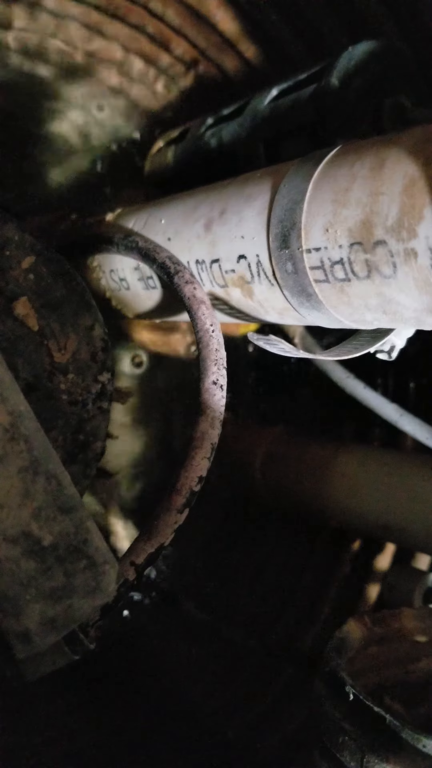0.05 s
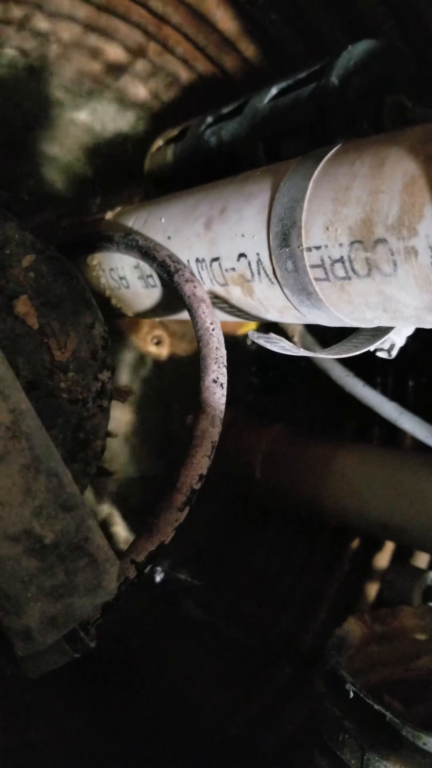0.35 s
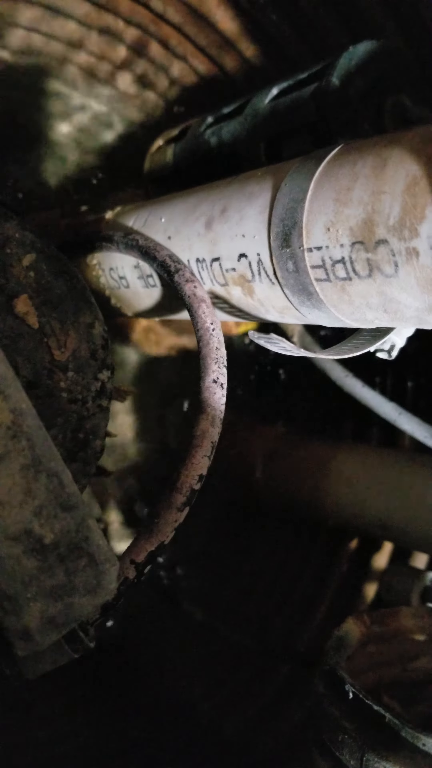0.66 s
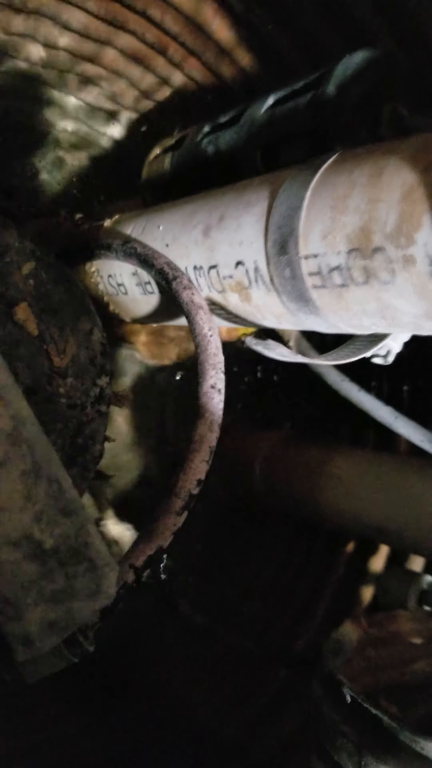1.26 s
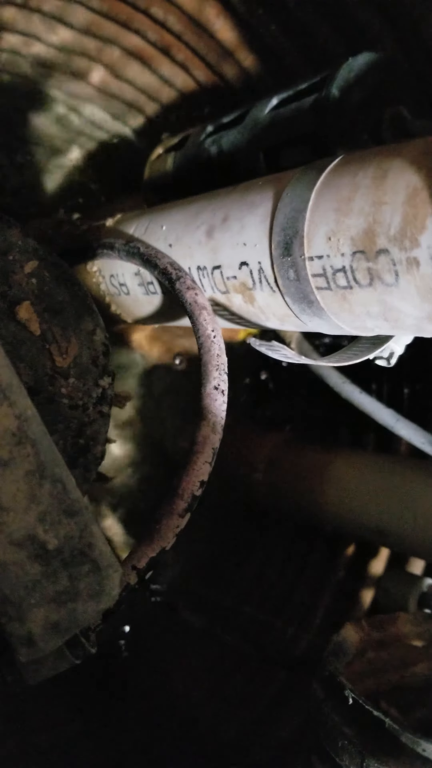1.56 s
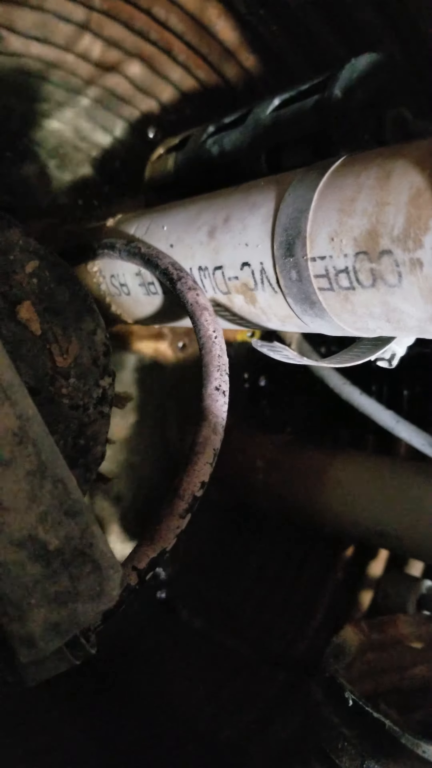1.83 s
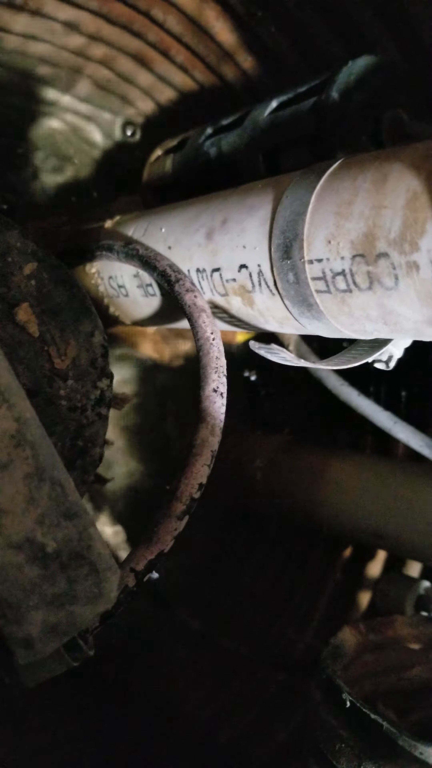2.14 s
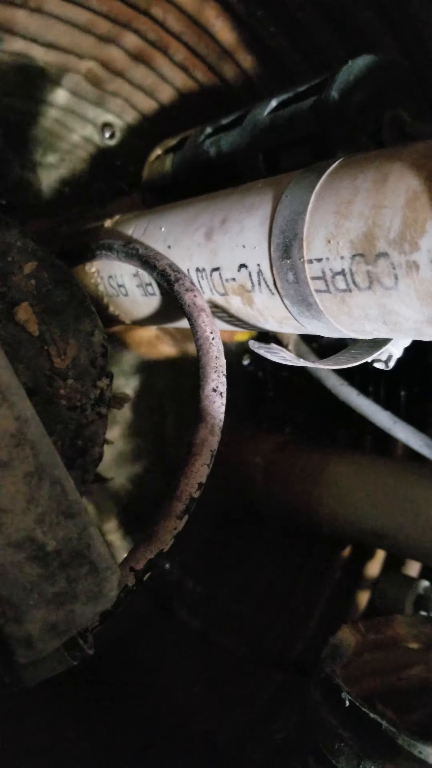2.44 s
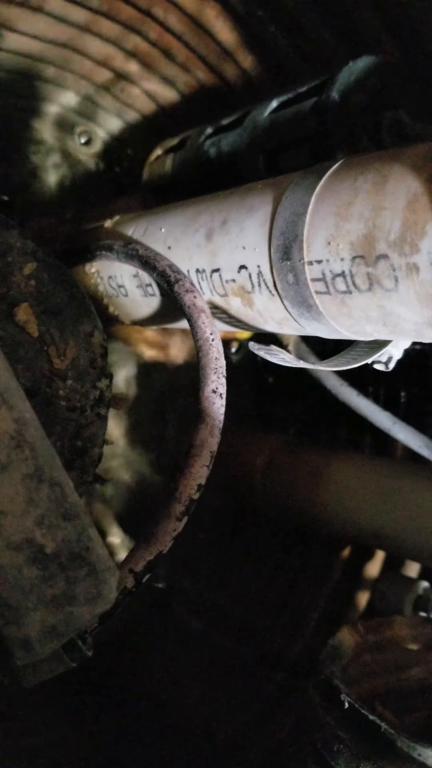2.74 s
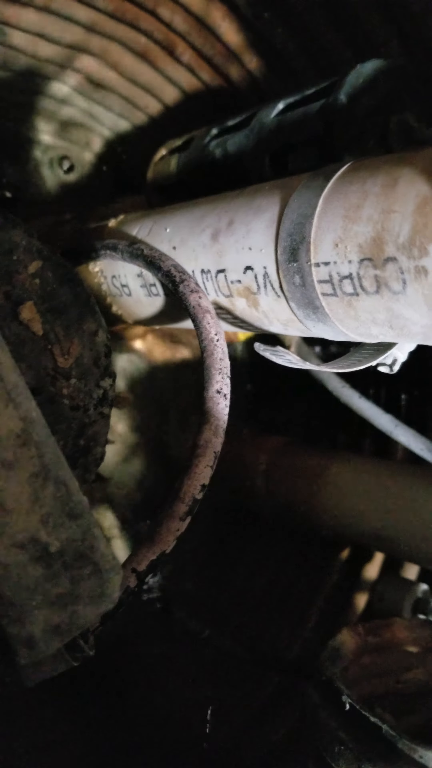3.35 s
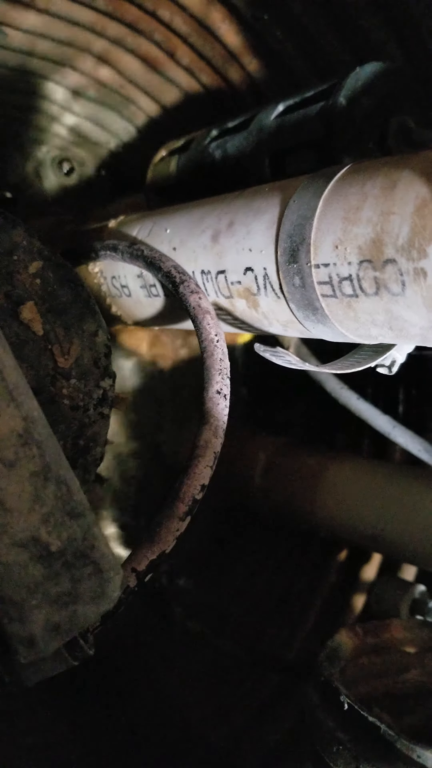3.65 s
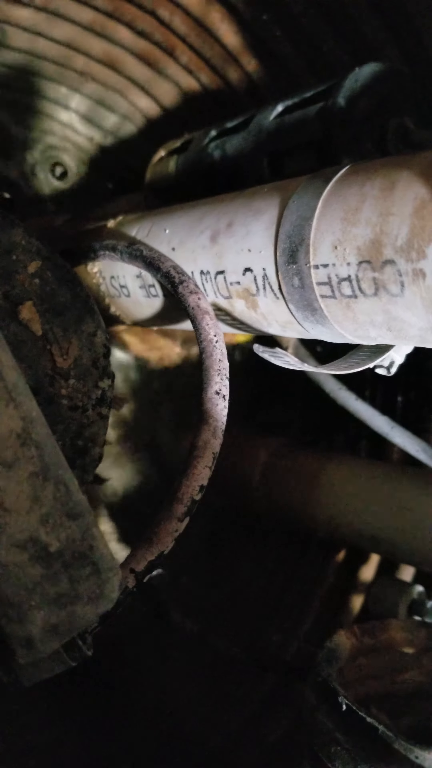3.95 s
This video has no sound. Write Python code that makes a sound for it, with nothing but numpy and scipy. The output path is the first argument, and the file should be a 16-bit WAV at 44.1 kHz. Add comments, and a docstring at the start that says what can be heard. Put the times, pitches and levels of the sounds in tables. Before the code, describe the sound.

Drops of water plop and tick in a sump pit with a short, close echo. A thin trickle and a few soft scuffs pass at the start, while a faint hiss dwindles and machinery hums steadily underneath.

```python
"""Dripping in a sump pit

Water drips into a narrow pit, heard from just above. Each drop slaps the pool and traps an air bubble
that rings as a damped oscillator; spatter ticks on the pipes, and the pit wall reflects it all.
A fine spray hisses and slowly dies away over the rumble and hum of machinery.
Early on there are soft bumps and scuffs."""
import sys
import numpy as np
from scipy import signal
from scipy.fft import rfft, irfft, next_fast_len
from scipy.io import wavfile
from scipy.ndimage import uniform_filter1d

SR = 44100
rng = np.random.default_rng(int(sys.argv[2]) if len(sys.argv) > 2 else 0)


def log_audio(samples):
    """Write samples as a 16-bit WAV file to the path given in sys.argv[1]."""
    # one column per channel
    frames = np.atleast_2d(samples).T
    # limit to full scale, then quantise
    limited = np.clip(frames, -1, 1)
    pcm = np.round(limited * 32767).astype(np.int16)
    wavfile.write(sys.argv[1], SR, pcm)


N = 176400
T = np.arange(N) / SR
EVENT_T = T[:SR // 4]  # time axis of one short event

# Spectra of the steady and flowing sources. Each row: frequency in Hz, relative density in dB.
RUMBLE_SPECTRUM = [(15, -20), (30, -15), (50, 1.5), (80, -4.5), (104, 0), (130, -7), (160, -7.5),
                   (195, -10), (250, -25), (350, -33), (700, -59.5), (2000, -59)]
AIR_SPECTRUM = [(60, -10), (150, 14), (250, -4), (400, 0.5), (540, 0), (760, -0.5), (1000, -9.5),
                (1500, -9), (3000, -22.5), (8000, -37.5), (16000, -9.5)]
SPRAY_SPECTRUM = [(900, -18), (1800, -23.5), (2600, -17.5), (4200, -17.5), (6000, -14.5), (7500, -14),
                  (9000, -8), (11000, -9.5), (13000, -5), (15500, 5.5)]
TRICKLE_SPECTRUM = [(1000, -27), (1800, -6), (2600, 1), (3500, -2.5), (4700, -7.5), (6200, -6.5),
                    (8000, -11)]
# Spectra of a bump, a scuff and the snap under a tick. Each row: frequency in Hz, relative level in dB.
BUMP_SPECTRUM = [(40, -4), (130, 3.5), (210, 11), (330, -18.5), (900, -17.5), (1500, -57), (5000, -65)]
SCUFF_SPECTRUM = [(150, -10), (250, -1), (480, -7), (800, -5), (1000, -8.5), (1300, -5), (1800, -6.5),
                  (2600, -1.5), (4000, -8.5), (8000, -19)]
SNAP_SPECTRUM = [(300, -59), (1100, -50), (2500, 13), (5000, 6.5), (10000, 7.5), (16000, -1)]
# Spectra that follow a tick's or a bubble's pitch. Each row: multiple of the pitch, relative level in dB.
TICK_SHAPE = [(.06, -71), (.3, -35), (.6, -33), (.85, -7), (1, 11), (1.15, -1.5), (1.7, 0)]
SLAP_SHAPE = [(.15, -65), (.55, -44), (.9, -8), (1.15, 8.5), (1.5, 2), (2.2, -5.5), (4, -13), (9, -24)]
# Responses of the pit's reverberation and the right microphone. Each row: frequency in Hz, gain in dB.
TAIL_RESPONSE = [(1000, -1), (3000, 0), (5500, -7), (12000, -11)]
RIGHT_MIC_RESPONSE = [(130, -2), (330, -3), (700, 2.5), (1500, -3.5), (4000, -3), (6200, 4), (7000, -9),
                      (7700, -9.5), (9000, -7), (11300, -3), (12500, -16), (14000, -19), (15500, -21)]
# Envelopes of the spray and the trickle. Each row: time in seconds, level in dB.
SPRAY_ENVELOPE = [(0, -45.5), (.5, -45.5), (.9, -46), (1.36, -50), (1.71, -45.5), (2.06, -49.5), (2.4, -53),
                  (2.63, -56), (3.1, -53), (3.28, -59.5), (3.44, -55.5), (3.6, -60), (4, -61)]
TRICKLE_ENVELOPE = [(0, -55), (.4, -59), (.75, -63.5), (1.2, -74.5), (4, -79)]
# Tones of the machinery. Each row: frequency in Hz, level in dB.
HUM_TONES = [(57, -49), (119.9, -53), (137.6, -59.5), (164, -62.5), (600, -82), (656, -79.5), (721, -85.5)]
# Soft bumps. Each row: start in seconds, level in dB.
BUMP_EVENTS = [(0.247, -42), (0.341, -52), (0.454, -48.5), (.473, -43.5)]
# Gritty scuffs. Each row: start in seconds, length in seconds, level in dB.
SCUFF_EVENTS = [(0.306, 0.084, -49.5), (0.477, 0.15, -44.5)]
# Spatter on hard surfaces. Each row: start in seconds, level in dB, pitch in Hz, relative snap in dB.
TICK_EVENTS = [(0.13, -37, 14300, -12), (0.309, -40, 14800, -16), (0.3279, -40, 8770, -30),
               (0.4807, -35, 11724, -13), (.6236, -57, 15200, 2), (0.688, -44, 14400, -17),
               (0.759, -45, 12100, -16), (.8130, -41, 14800, -3), (0.854, -39, 15300, -7.5),
               (0.9525, -34.5, 14300, -46), (1.0252, -32, 14300, -17), (1.414, -48, 14600, -11),
               (1.4273, -38, 8600, -11.5), (1.5977, -32, 11900, -14), (1.6667, -48, 15200, -7),
               (1.735, -43, 15200, -6.5), (1.8267, -28.5, 11400, -1.5), (1.8648, -37.5, 12200, -6),
               (3.0209, -36, 15400, -15), (3.0573, -53, 15500, -8), (3.088, -55, 9500, 7),
               (3.1040, -38, 14900, -23), (3.159, -64, 15500, -17), (3.4238, -46, 14800, -19.5),
               (3.4626, -46.5, 9275, -20), (3.64, -38.5, 14992, -7.5), (3.8353, -44.5, 14900, -13.5)]
# Large, low bubbles. Each row: start in seconds, pitch in Hz, level in dB.
GULP_EVENTS = [(0.473, 483, -46), (.488, 1297, -51), (.508, 805, -52.5), (2.798, 484, -56)]
# Drops that trap a bubble. Each row: start in seconds, bubble pitch in Hz, bubble level in dB,
# time to decay by 60 dB in seconds, slap level in dB, left minus right level in dB.
DRIP_EVENTS = [(0.0095, 1930, -36.5, 0.028, -47, -1.5), (0.3136, 2590, -34, 0.013, -44, 5.5),
               (0.3608, 3510, -52, 0.023, -54, 2), (0.8129, 4180, -34, 0.0087, -39.5, 0.5),
               (0.816, 2780, -67, 0.014, -38, -6), (0.8586, 1740, -60, 0.064, -55, -1),
               (0.859, 2360, -46, 0.022, -57, -4), (1.0268, 3045, -43, 0.019, -53, 0.5),
               (1.0725, 5050, -61, 0.033, -76, 1), (1.1233, 6120, -59, 0.024, -63, -3),
               (1.4156, 1780, -43, 0.11, -53, 3.5), (1.4141, 2224, -49, 0.081, -58, -5),
               (1.459, 4560, -59.5, .015, -62, 0), (1.5041, 5920, -52.5, 0.03, -54, -6),
               (1.504, 3050, -59, 0.041, -61, -4), (1.598, 1586, -54, 0.089, -55, -1),
               (1.612, 2250, -38, 0.066, -41, 3), (1.6140, 1420, -44, 0.084, -65, -9),
               (1.675, 2700, -56.5, 0.014, -53.5, 4), (1.714, 2180, -59.5, .03, -68, 2),
               (1.7353, 3800, -38.5, 0.0081, -45.5, 2.5), (1.7902, 1672, -38.5, 0.13, -41, 2),
               (1.828, 2970, -27.5, 0.0085, -36, -4.5), (1.8304, 3820, -28.5, 0.008, -35, -3.5),
               (1.8824, 1987, -37.5, 0.039, -46, -2.5), (2.027, 5370, -62, 0.019, -68, -7),
               (2.291, 2434, -42.5, 0.019, -44, -4.5), (2.752, 3030, -64, 0.021, -66, -8),
               (2.824, 2404, -43.5, 0.074, -57.5, -4.5), (2.868, 5080, -51, 0.02, -62, 2),
               (3.02, 1677, -48.5, 0.11, -57, -4.5), (3.0572, 2254, -38.5, 0.049, -55, 4),
               (3.059, 5100, -40.5, 0.012, -46.5, -1.5), (3.0888, 1646, -51, 0.072, -45, -2.5),
               (3.1588, 1948, -36, 0.036, -41, 0), (3.292, 1900, -59, 0.12, -74, -1),
               (3.314, 1570, -48, 0.024, -55.5, -4), (3.627, 1388, -44, 0.075, -50, -7.5),
               (3.64, 5340, -33.5, 0.014, -44, -4), (3.64, 4670, -35, 0.0063, -40, 3),
               (3.7651, 1617, -46.5, 0.13, -56.5, -9.5), (3.8307, 2950, -59, 0.0055, -68, 6),
               (3.876, 1684, -66, 0.062, -67, 0)]


def amp(db):
    """Amplitude grows tenfold for every 20 dB."""
    return 10 ** (np.asarray(db) / 20)


def unit(x):
    """Normalisation by mean power: each channel gets rms 1."""
    return x / np.sqrt(np.mean(x ** 2, -1, keepdims=True) + 1e-20)


def unit_peak(x):
    """Normalisation by short-time power: the loudest 5 ms of each channel get rms 1."""
    power = uniform_filter1d(x ** 2, size=220, axis=-1)
    return x / np.sqrt(power.max(-1, keepdims=True) + 1e-20)


def pan(db):
    """A level difference, left minus right, gives a sense of direction."""
    return amp([[db / 2], [-db / 2]])


def decay(t60):
    """Exponential damping: 60 dB in t60 seconds."""
    return np.exp(-np.log(1000) * EVENT_T / t60)


def envelope(points):
    """A gain over the whole scene, linear in decibels between (s, dB) points."""
    return amp(np.interp(T, *np.transpose(points)))


def colour(x, points):
    """Zero-phase filtering: the spectrum is multiplied by a (Hz, dB) curve."""
    n = x.shape[-1]
    size = next_fast_len(n + SR // 20)
    hz, db = np.transpose(points)
    log_hz = np.log(np.fft.rfftfreq(size, 1 / SR) + 1)
    gain = amp(np.interp(log_hz, np.log(hz), db))
    return irfft(rfft(x, size) * gain, size)[..., :n]


def transposed(hz, shape):
    """Frequency scaling places a (multiple, dB) shape on a pitch."""
    return [(hz * multiple, db) for multiple, db in shape]


def add(mix, start, sound):
    """Superposition: a sound joins the mix at its start in seconds."""
    part = mix[:, max(round(start * SR), 0):][:, :sound.shape[-1]]
    part += sound[..., :part.shape[1]]


def noise(correlation):
    """Two channels of white noise are correlated through a common part."""
    common, own = rng.standard_normal((2, N))
    return np.array([common, correlation * common + np.sqrt(1 - correlation ** 2) * own])


def clicks(per_s, spread_db):
    """A Poisson process: independent impulses of uneven size and either sign."""
    size = amp(spread_db * np.minimum(rng.exponential(1, N), 4))
    return size * rng.choice([-1, 1], N) * (rng.random(N) < per_s / SR)


def impact(t60, spectrum):
    """A brief blow excites a broad band: damped noise with the given spectrum."""
    blow = rng.standard_normal(len(EVENT_T)) * decay(t60) * (EVENT_T > .0006)
    return colour(blow, spectrum)


def pit(x, wall_db=-2, fast_db=-9, slow_db=-21):
    """Convolution with direct sound, wall reflections and a two-slope tail, new for every spot."""
    wall, diffuse = rng.standard_normal((2, 2, len(EVENT_T)))
    wall = wall * (rng.integers(0, 20, wall.shape) == 0) * (EVENT_T > .0012)  # sparse, after 1.2 ms
    reflections = amp(wall_db) * unit(wall * decay(t60=.03))
    tail = np.hypot(amp(fast_db) * unit(decay(t60=.12)), amp(slow_db) * unit(decay(t60=.38)))
    response = (reflections + colour(diffuse * tail, TAIL_RESPONSE)) / np.sqrt(len(EVENT_T))
    response[0, 10] += 1
    response[1, rng.integers(0, 20)] += 1  # the direct sound comes a little earlier or later here
    return signal.fftconvolve(np.atleast_2d(x), response, axes=1)[:, :x.shape[-1]]


def bubble(hz, t60, rise_s, sharp_share=.11, settle_cycles=4.5, wobble_share=.011):
    """Trapped air resonates as a damped oscillator; its pitch starts sharp, settles and wobbles."""
    wobble = unit(uniform_filter1d(rng.standard_normal(len(EVENT_T)), size=130))
    sharpness = sharp_share * np.exp(-EVENT_T * hz / settle_cycles)
    cycles = np.cumsum(hz * (1 + sharpness + wobble_share * wobble)) / SR
    swell = 1 - np.exp(-EVENT_T / rise_s)
    damping = np.exp(-np.log(1000) * (EVENT_T / t60) ** 1.15)  # holds briefly, then drops
    return np.sin(2 * np.pi * cycles) * damping * swell


def machinery(rumble_db=-48.5, air_db=-63, waver_depth=.16):
    """Rumble and rushing air are noise bands; the hum's tones are modulated in amplitude and phase."""
    drone = amp(rumble_db) * unit(colour(noise(correlation=.98), RUMBLE_SPECTRUM))
    for hz, db in HUM_TONES:
        swell, drift = signal.resample(rng.standard_normal((2, 20)), N, axis=1) * waver_depth
        phase = 2 * np.pi * (hz * T + rng.random()) + drift
        drone += amp(db) * unit((1 + swell) * np.sin(phase))
    air = amp(air_db) * unit(colour(noise(correlation=.15), AIR_SPECTRUM))
    return pan(-1) * drone + pan(-2.5) * air


def bumps_and_scuffs():
    """Near the microphone, soft impacts give dull bumps and friction gives a rush of tiny clicks."""
    out = np.zeros((2, N))
    for start, db in BUMP_EVENTS:
        add(out, start, amp(db) * unit_peak(impact(t60=.047, spectrum=BUMP_SPECTRUM)))
    for start, length, db in SCUFF_EVENTS:
        stroke = np.sin(np.pi * np.minimum(EVENT_T / length, 1) ** .33)  # peaks early
        grit = colour(clicks(per_s=1400, spread_db=3)[:len(EVENT_T)], SCUFF_SPECTRUM)
        add(out, start, amp(db) * unit_peak(pit(grit * stroke)))
    return pan(-2) * out


def patter(per_s, spread_db, spots):
    """Droplets on many spots, each with its own reflections, add incoherently."""
    return unit(sum(pit(clicks(per_s / spots, spread_db)) for _ in range(spots)))


def bubble_swarm(span_hz, per_s, spread_db, pitches=24, ring_cycles=22):
    """Tiny bubbles of equal quality factor start at random; each dies within the same number of cycles."""
    swarm = np.zeros((2, N))
    for hz in np.linspace(*span_hz, pitches):
        onsets = clicks(per_s / pitches, spread_db)
        ring = unit(pit(bubble(hz, t60=ring_cycles / hz, rise_s=.0001)))
        swarm += signal.oaconvolve(onsets[None], ring, axes=1)[:, :N]
    return unit(swarm)


def spray(fizz_db=2, mist_gain=.5):
    """Droplets, tiny bubbles and mist, too dense for the ear to resolve, merge into a dwindling hiss."""
    fizz = bubble_swarm(span_hz=(5000, 15500), per_s=800, spread_db=4.3)
    drops = patter(per_s=1400, spread_db=5.2, spots=12) + amp(fizz_db) * fizz
    mist = mist_gain * noise(correlation=0)
    return envelope(SPRAY_ENVELOPE) * unit(colour(unit(drops) + mist, SPRAY_SPECTRUM))


def trickle(ring_db=-3):
    """A thin flow sounds through small impacts and bubble resonance; it runs out early."""
    ringing = bubble_swarm(span_hz=(1900, 7000), per_s=220, spread_db=4)
    flow = patter(per_s=550, spread_db=3, spots=6) + amp(ring_db) * ringing
    return envelope(TRICKLE_ENVELOPE) * unit(colour(flow, TRICKLE_SPECTRUM))


def spatter(t60=.013):
    """Brief contact with a hard surface gives a bright tick: a spectral peak over a broad snap."""
    out = np.zeros((2, N))
    for start, db, hz, snap_db in TICK_EVENTS:
        tick = unit_peak(impact(t60, transposed(hz, TICK_SHAPE)))
        snap = amp(snap_db) * unit_peak(impact(t60, SNAP_SPECTRUM))
        add(out, start, amp(db) * unit_peak(pit(tick + snap)))
    return out


def drips(slap_t60=.023, slap_rise_s=.0003):
    """Impact on the pool gives a slap, and the trapped bubble resonates; large bubbles gulp lower."""
    out = np.zeros((2, N))
    cushion = 1 - np.exp(-EVENT_T / slap_rise_s)
    for start, hz, ring_db, t60, slap_db, pan_db in DRIP_EVENTS:
        ring = unit_peak(pit(bubble(hz, t60, rise_s=.0007)))
        slap = unit_peak(pit(cushion * impact(slap_t60, transposed(hz, SLAP_SHAPE))))
        add(out, start, pan(pan_db) * (amp(ring_db) * ring + amp(slap_db) * slap))
    for start, hz, db in GULP_EVENTS:
        gulp = unit_peak(pit(bubble(hz, t60=.05, rise_s=.00067)))
        add(out, start, amp(db) * gulp)
    return out


def scene():
    """The pressures of all sources add linearly above the pit."""
    return drips() + spatter() + spray() + trickle() + machinery() + bumps_and_scuffs()


def record(dry, cutoff_hz=15800):
    """Linear filtering: the right microphone is duller than the left, and a low-pass limits both."""
    both = np.array([dry[0], colour(dry[1], RIGHT_MIC_RESPONSE)])
    low_pass = signal.firwin(511, cutoff_hz, window=("kaiser", 9), fs=SR)
    return signal.oaconvolve(both, low_pass[None], "same", axes=1)


dry = scene()
out = record(dry)
log_audio(out)
```